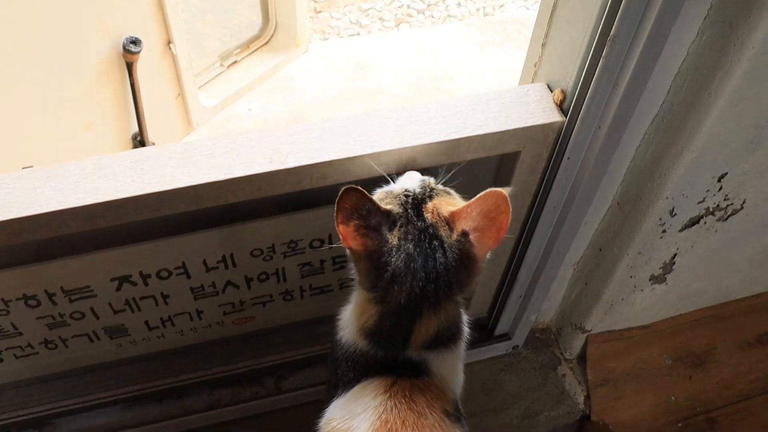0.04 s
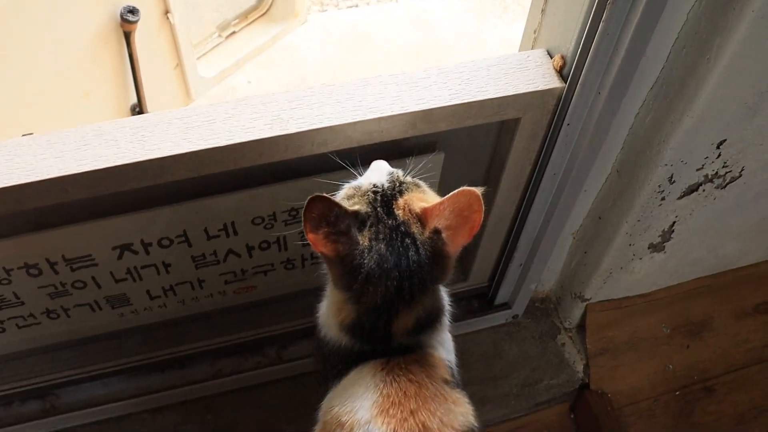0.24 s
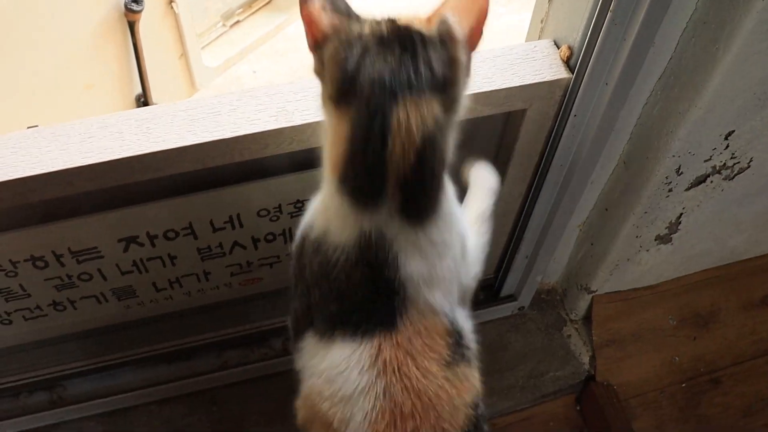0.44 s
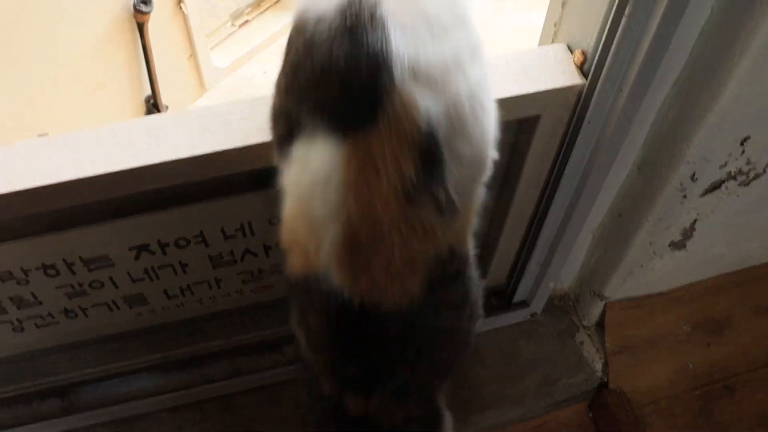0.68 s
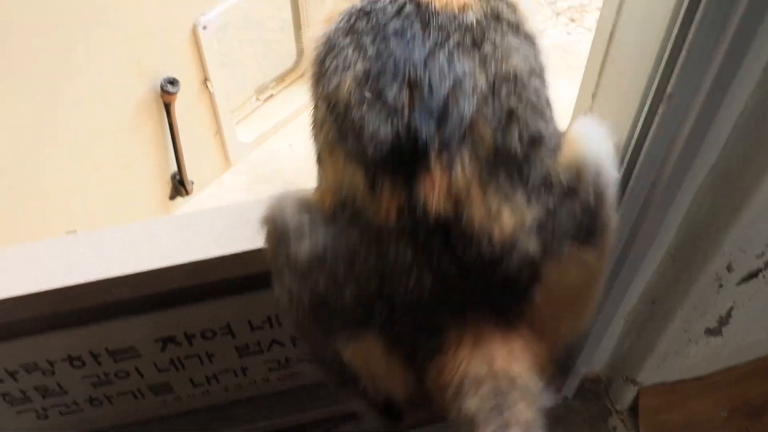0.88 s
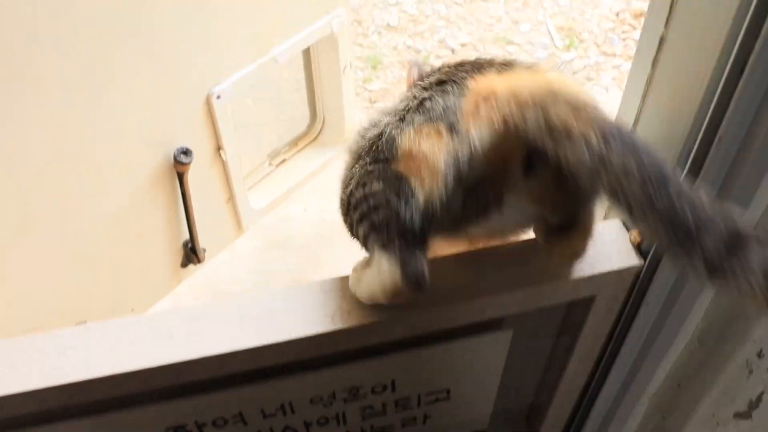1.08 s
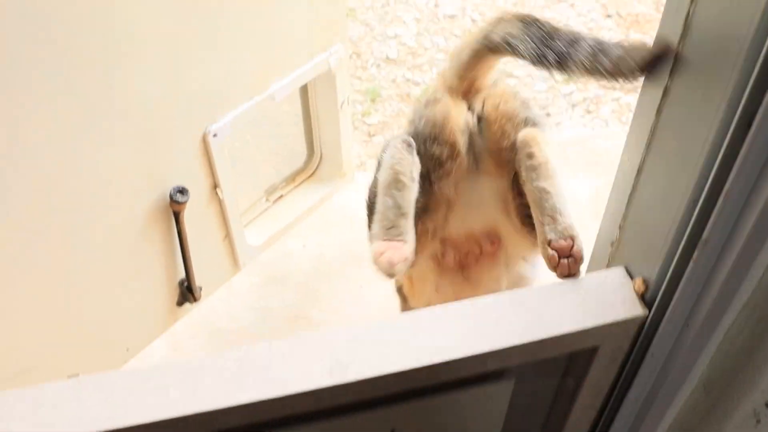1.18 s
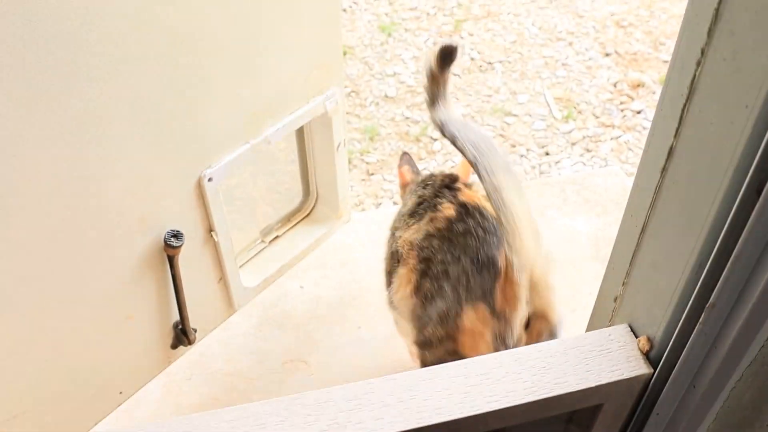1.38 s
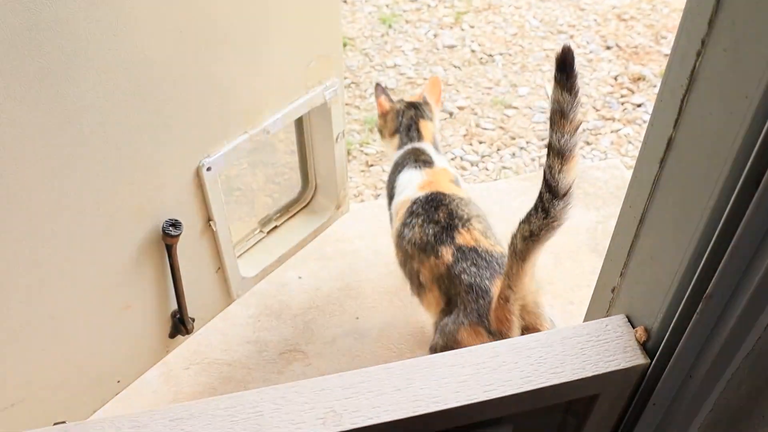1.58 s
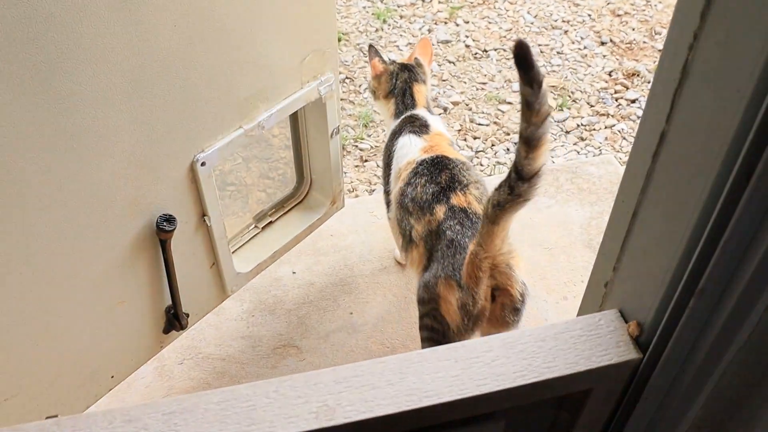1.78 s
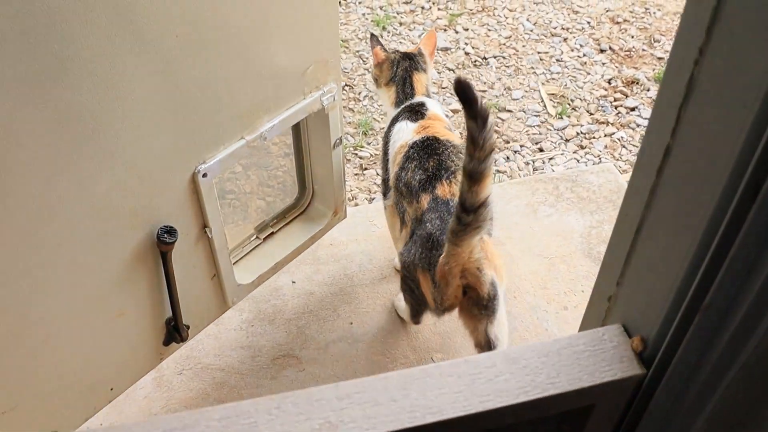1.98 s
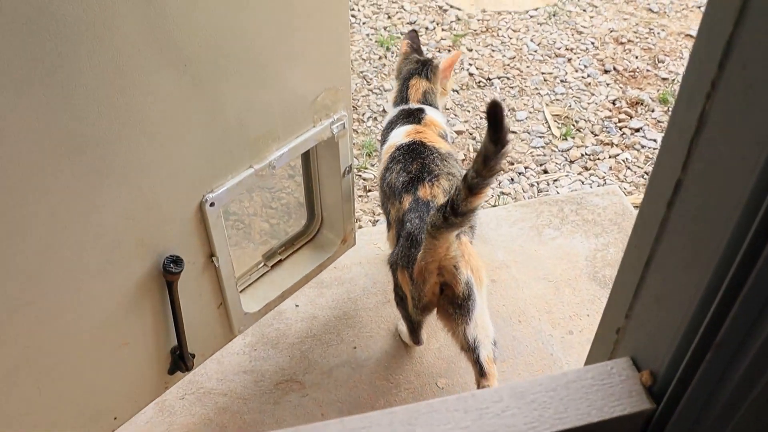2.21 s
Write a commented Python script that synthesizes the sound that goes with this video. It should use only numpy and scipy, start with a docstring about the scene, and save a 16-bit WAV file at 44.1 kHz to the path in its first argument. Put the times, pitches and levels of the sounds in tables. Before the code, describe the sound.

A cat trills briefly in a doorway, rising at the end. Its paws knock and scrape over a low panel, then soft thuds and steps follow. A faint falling whistle, probably a bird, comes last over low background rumble.

```python
"""A cat's rolled chirrup, ending in an upward flick, sounds in a doorway over quiet hiss and rumble.
The roll modulates the amplitude and pitch of a harmonic voice, which the throat's resonances filter.
The cat jumps a low door panel: its paws excite the panel's damped modes, and fur and claws add
friction noise. It lands outside with soft thuds and walks off. Last comes a thin falling whistle,
probably a bird, reverberating in the yard."""
import sys
import numpy as np
from scipy import signal
from scipy.fft import rfft, irfft
from scipy.io import wavfile
from scipy.ndimage import uniform_filter1d

SR = 44100
rng = np.random.default_rng(int(sys.argv[2]) if len(sys.argv) > 2 else 0)


def wav_record(signal):
    """Record a signal, one row per channel, as 16-bit PCM in the file named by sys.argv[1]."""
    frames = np.transpose(np.atleast_2d(signal))
    bounded = np.clip(frames, -1, 1)
    # unit amplitude maps onto the largest positive 16-bit level
    quanta = np.round(bounded * 32767).astype(np.int16)
    wavfile.write(sys.argv[1], SR, quanta)


N = 99225
T = np.arange(N) / SR

# contour of the voice: time_s, pitch_hz, level_db
VOICE_CONTOUR = [(.185, 500, -41), (.196, 534.5, -37), (.226, 571.5, -24), (.251, 501.5, -22),
                 (.274, 464.9, -30.5), (.298, 479, -20.5), (.32, 500, -29.5), (.346, 522, -20.5),
                 (.374, 470.5, -24), (.399, 504, -30), (.424, 529.1, -19), (.452, 476.7, -19),
                 (.5, 512.2, -17.5), (.57, 549, -21), (.634, 511.7, -22.5), (.66, 551, -20.5),
                 (.686, 464.8, -34.5), (.709, 512.4, -22.5), (.75, 728.5, -24.5), (.762, 738, -56)]
# roll that chops the voice: time_s, rate_hz, depth_share
VOICE_ROLL = [(.208, 46.5, .7), (.3, 42.3, .92), (.385, 36.8, .92), (.46, 42.5, .85), (.53, 39.3, .9),
              (.61, 34, .87), (.68, 39.5, .78), (.725, 38, .1)]
# throat filter on the harmonics: frequency_hz, gain_db
THROAT_RESPONSE = [(400, 2.5), (720, -5), (860, -7.5), (1040, -8), (1200, -18.5), (1380, -19.5),
                   (1520, -35), (1750, -46), (2000, -55), (2600, -35.5), (4000, -83)]
# upper resonance, sinking as the mouth changes shape: time_s, centre_hz, noise_gain_db
MOUTH_FORMANT = [(.24, 1660, -21.5), (.43, 1700, -17), (.49, 1426, -18), (.67, 1363, -10)]
# rasp in the throat: frequency_hz, relative_density_db
RASP_SPECTRUM = [(200, -68), (400, 11.5), (600, -1.5), (760, -2.5), (950, -3.5), (1200, 4.5), (1450, -23),
                 (1700, -8), (2000, -23.5), (2600, -21), (4000, -30.5), (12000, -66)]
# paws striking the panel: start_s, level_db, brightness_db_per_octave
PAW_KNOCKS = [(0.8094, -22.5, 0), (1.04, -44, 0), (1.06, -27.5, 1)]
# modes of the door panel: frequency_hz, gain_db, swell_s, t60_s
PANEL_MODES = [(257, -14.5, 0.0044, 0.11), (322.4, -10.5, .013, .075), (399, -18.5, 0.019, 0.11),
               (836, -13, 0.0043, .04), (877.7, 2, 0.0069, 0.029), (943, -7, 0.0045, 0.052),
               (1310, -21, .0015, 0.037), (1813, -20.5, 0.0051, 0.047)]
# dull thump of a pad: frequency_hz, relative_density_db
PAD_SPECTRUM = [(230, 2.5), (1200, -10), (3000, -27)]
# fur and paws brushing: peak_s, level_db, rise_s, fall_s, tilt_db_per_octave, resonance_hz
FUR_SCUFFS = [(0.617, -41.5, 0.0049, 0.012, -4, 2620), (0.811, -41, 0.0025, 0.016, -0.5, 3430),
              (1.054, -37.5, 0.0062, 0.011, 3, 2600), (1.067, -39.5, 0.015, .014, 3, 2870),
              (1.23, -49, 0.048, 0.051, 0.5, 9270), (1.958, -47.5, 0.0029, 0.011, -1.5, 3050),
              (1.592, -48.5, 0.0046, 0.04, -0.5, 3640), (2.106, -46.5, 0.011, 0.013, 3, 2560),
              (2.166, -47.5, 0.0043, 0.023, -3, 1010)]
# brushing noise: frequency_hz, relative_density_db
SCUFF_SPECTRUM = [(200, -7), (600, -11.5), (1500, -3), (3800, -2.5), (5000, -10), (7000, -6), (14500, -32)]
# hind claws slipping off the panel: peak_s, level_db, rise_s, fall_s
CLAW_SLIPS = [(1.195, -44, .022, .012), (1.222, -35, .008, .006), (1.2345, -24.5, .0035, .0035),
              (1.26, -37.5, .014, .03)]
# scraping noise: frequency_hz, relative_density_db
SCRAPE_SPECTRUM = [(150, -7), (260, 4), (600, -8), (1200, -11), (2800, -2), (6200, -13), (13500, -35)]
# resonances of the panel's frame: centre_hz, half_width_hz, boost_db
FRAME_RESONANCES = [(889, 83, 22), (1840, 104, 10), (2900, 49, 9), (3340, 43, 9), (3795, 100, 12.5)]
# thuds of the cat's weight: peak_s, level_db, rise_s, fall_s, pitch_hz
BODY_THUDS = [(0.271, -32.5, 0.0074, 0.016, 94.4), (0.763, -37, 0.0079, 0.049, 80.4),
              (1.255, -36, 0.01, 0.032, 90), (1.422, -39.5, .012, 0.017, 93),
              (1.657, -34.5, 0.013, 0.023, 90.4), (1.702, -30.5, 0.01, 0.028, 84.3)]
# the whistle's main tone: time_s, pitch_hz, level_db
WHISTLE_MAIN = [(1.83, 4320, -58), (1.868, 4270, -36.5), (1.908, 4162, -39), (1.93, 4107, -44.5),
                (1.98, 3990, -42), (2.021, 3960, -40.5), (2.045, 3932, -46.5), (2.188, 3844, -38.5),
                (2.25, 3873, -41)]
# its brief upper tone, which leads: time_s, pitch_hz, level_db
WHISTLE_UPPER = [(1.79, 4830, -52), (1.808, 4930, -53), (1.845, 4600, -47.5), (1.875, 4430, -38)]
# outdoor hiss: frequency_hz, relative_density_db
AIR_SPECTRUM = [(130, -2), (500, -10), (2200, -14.5), (3600, -12.5), (5000, -19), (6500, -18.5),
                (10000, -24.5), (15500, -27)]
# low rumble: frequency_hz, relative_density_db
RUMBLE_SPECTRUM = [(20, -1.5), (80, -2.5), (120, -16), (600, -48)]
# course of the rumble: time_s, level_db
RUMBLE_CONTOUR = [(0, -52.5), (1.8, -53.5), (2, -60)]
# fading of a thin high hiss: time_s, level_db
HISS_CONTOUR = [(0, -57), (1, -76)]


def chirrup():
    """Source and filter: the throat shapes harmonics that the roll chops about forty times a second."""
    pitch_hz, level_db = curves(VOICE_CONTOUR)
    roll_hz, depth = curves(VOICE_ROLL)
    mouth_hz, mouth_db = curves(MOUTH_FORMANT)
    first_opening_s, mouth_width_hz, mouth_boost_db = .2082, 207, 13.5
    turns = np.cumsum(roll_hz) / SR
    turns = turns - np.interp(first_opening_s, T, turns) + .03 * wander(59.6)  # the roll is uneven
    roll = np.cos(2 * np.pi * turns)
    closure = depth * (.5 - .5 * np.tanh(2.08 * (roll - .358)))
    arch = .13 * depth * (np.maximum(roll, 0) - .8)  # each opening lifts the pitch
    jitter = .0336 * depth * wander(370)
    pitch_hz = pitch_hz * (1 + arch - .05 * closure ** 2 + jitter)
    phase = 2 * np.pi * np.cumsum(pitch_hz) / SR
    tone = 0
    for k in range(1, 8):
        formant = amp(mouth_boost_db / (1 + (2 * (k * pitch_hz - mouth_hz) / mouth_width_hz) ** 2))
        shimmer = amp(1.3 * depth * wander(260))
        tone += amp(spectrum_db(THROAT_RESPONSE, k * pitch_hz)) * formant * shimmer * np.sin(k * phase)
    baseband = wander(mouth_width_hz) + 1j * wander(mouth_width_hz)
    mouth_noise = (baseband * np.exp(2j * np.pi * np.cumsum(mouth_hz) / SR)).real / 2
    breath = amp(-13.5) * noise(RASP_SPECTRUM) + amp(mouth_db) * mouth_noise
    rasp = depth * (1 - .69 * closure) * breath
    sounding = (T > VOICE_CONTOUR[0][0]) & (T < VOICE_CONTOUR[-1][0])
    gate = uniform_filter1d(1. * sounding, size=200)
    return gate * amp(level_db) * ((1 - closure) * tone + rasp)


def panel_knocks():
    """Impact excitation: each paw thumps the panel and sets its damped modes ringing."""
    out = 0
    for start_s, level_db, brightness in PAW_KNOCKS:
        for hz, mode_db, swell_s, t60_s in PANEL_MODES:
            gain = amp(level_db + mode_db + brightness * max(np.log2(hz / 900), 0))
            bend = .14 if hz < 500 else 0  # low modes start flat and rise as the paw presses
            out += gain * damped_mode(start_s, hz, swell_s, t60_s, bend)
        pad = burst(start_s + .0081, rise_s=.0024, fall_s=.022) * noise(PAD_SPECTRUM)
        out += amp(level_db - 18.5) * pad
    return out


def fur_scuffs():
    """Friction noise: fur and pads brush grainily, each touch coloured by a local resonance."""
    boost_db, width_octaves, grain_db = 12.5, .17, 1.8
    out, hz = 0, np.geomspace(200, 16000, 200)
    for peak_s, level_db, rise_s, fall_s, tilt, resonance_hz in FUR_SCUFFS:
        resonance_db = boost_db * np.exp(-(np.log2(hz / resonance_hz) / width_octaves) ** 2)
        shape_db = spectrum_db(SCUFF_SPECTRUM, hz) + resonance_db
        out += amp(level_db) * burst(peak_s, rise_s, fall_s) * noise(np.c_[hz, shape_db], tilt)
    return amp(grain_db * wander(900)) * out


def claw_scrape():
    """Stick-slip friction: hind claws jerk over the panel's edge and snap free, ringing its frame."""
    force = sum(amp(db) * burst(*timing) for db, timing in ((s[1], (s[0], *s[2:])) for s in CLAW_SLIPS))
    hz = np.geomspace(150, 16000, 900)
    frame_db = sum(db / (1 + ((hz - centre) / width) ** 2) for centre, width, db in FRAME_RESONANCES)
    shape_db = spectrum_db(SCRAPE_SPECTRUM, hz) + frame_db
    grain = amp(2.6 * wander(390))
    return force * grain * noise(np.c_[hz, shape_db])


def body_thuds():
    """Heavily damped vibration: low booms as the cat's weight shifts and lands."""
    return sum(amp(db) * burst(peak_s, rise_s, fall_s) * np.sin(2 * np.pi * hz * (T - peak_s))
               for peak_s, db, rise_s, fall_s, hz in BODY_THUDS)


def paw_step():
    """Light impact: a paw set on the step excites one hollow mode and a broadband tick."""
    start_s = 1.5395
    tap = damped_mode(start_s, hz=425, swell_s=.002, t60_s=.05)
    tick = burst(start_s + .0016, rise_s=.00099, fall_s=.0077) * noise(SCUFF_SPECTRUM, -3)
    return amp(-37) * tap + amp(-45.5) * tick


def whistle():
    """Frequency modulation: two overlapping, falling tones grow purer as their random waver decays."""
    out, settle_s, flutter_db = 0, .22, 2.8
    for note, end_s in ((WHISTLE_UPPER, WHISTLE_UPPER[-1][0]), (WHISTLE_MAIN, np.inf)):
        pitch_hz, level_db = curves(note)
        age = T - note[0][0]
        waver = .018 * np.exp(-np.maximum(age, 0) / settle_s) * wander(550)
        phase = 2 * np.pi * np.cumsum(pitch_hz * (1 + waver)) / SR
        sounding = (age > 0) & (T < end_s)
        out += sounding * amp(level_db + flutter_db * wander(130)) * np.sin(phase)
    return reverberate(out, t60_s=.86, wet_db=-8.5)


def background():
    """Ambient noise: hiss over an uneven rumble; a high hiss and a faint whistle die away early."""
    high_hiss = amp(curves(HISS_CONTOUR)[0]) * noise([(11590, -50), (12200, 0)])
    whistle_tail = amp(-51) * np.exp(-T / .042) * wander(180) * np.sin(2 * np.pi * 3550 * T)
    air = amp(-54.5 + .5 * wander(1.1)) * noise(AIR_SPECTRUM)
    rumble = amp(curves(RUMBLE_CONTOUR)[0] + 1.5 * wander(5.1)) * noise(RUMBLE_SPECTRUM)
    return air + rumble + high_hiss + whistle_tail


def amp(db):
    """Decibels as an amplitude ratio."""
    return 10 ** (np.asarray(db) / 20)


def curves(table):
    """Linear interpolation of each column over time."""
    times, *columns = np.array(table, float).T
    return [np.interp(T, times, column) for column in columns]


def spectrum_db(points, hz):
    """Spectral envelope, interpolated over log frequency."""
    points_hz, db = np.array(points, float).T
    return np.interp(np.log(hz + 1), np.log(points_hz), db)


def noise(points, tilt_db_per_octave=0):
    """Spectral shaping of white noise, scaled to unit RMS."""
    hz = np.arange(N // 2 + 1) * SR / N
    ratio = hz / points[0][0]
    tilt_db = tilt_db_per_octave * np.log2(np.maximum(ratio, 1))
    low_cut = np.minimum(ratio, 1) ** 2
    gain = amp(spectrum_db(points, hz) + tilt_db) * low_cut
    shaped = irfft(rfft(rng.standard_normal(N)) * gain, N)
    return shaped / shaped.std()


def wander(rate_hz):
    """Low-pass noise of unit spread, changing about rate_hz times a second."""
    span = max(int(SR / rate_hz), 1)
    smooth = uniform_filter1d(uniform_filter1d(rng.standard_normal(N), span), span)
    return smooth / smooth.std()


def burst(peak_s, rise_s, fall_s):
    """Exponential growth to a peak, then exponential decay."""
    return np.exp(-np.maximum((peak_s - T) / rise_s, (T - peak_s) / fall_s))


def damped_mode(start_s, hz, swell_s, t60_s, bend=0):
    """Damped oscillation that swells and rings down, starting flat by the share bend."""
    age, bend_s = np.maximum(T - start_s, 0), .012
    envelope = (1 - np.exp(-(age / swell_s) ** 2)) * np.exp(-np.log(1000) * age / t60_s)
    lag_s = bend * bend_s * (1 - np.exp(-age / bend_s))
    return envelope / envelope.max() * np.sin(2 * np.pi * hz * (age - lag_s))


def reverberate(dry, t60_s, wet_db):
    """Convolution with decaying noise adds diffuse reflections."""
    build_up = 1 - np.exp(-(T / .0099) ** 2)
    tail = rng.standard_normal(N) * np.exp(-np.log(1000) * T / t60_s) * build_up
    return dry + amp(wet_db) * signal.fftconvolve(dry, tail / np.linalg.norm(tail))[:N]


def scene():
    """Superposition of the cat in the doorway, its step outside and the yard beyond."""
    room_t60_s = .24
    paws = panel_knocks() + fur_scuffs() + claw_scrape()
    voice = reverberate(chirrup(), room_t60_s, wet_db=-14)
    inside = voice + reverberate(paws, room_t60_s, wet_db=-16) + body_thuds()
    return (inside + paw_step() + whistle() + background())[None]


def record(dry):
    """A steep low-pass filter removes the highest treble."""
    cutoff_hz = 15850
    return signal.sosfilt(signal.ellip(10, .2, 70, cutoff_hz, fs=SR, output="sos"), dry)


dry = scene()
out = record(dry)
wav_record(out)
```